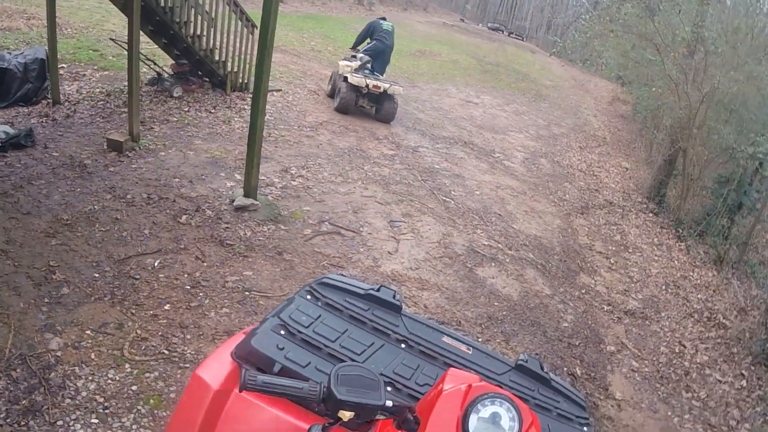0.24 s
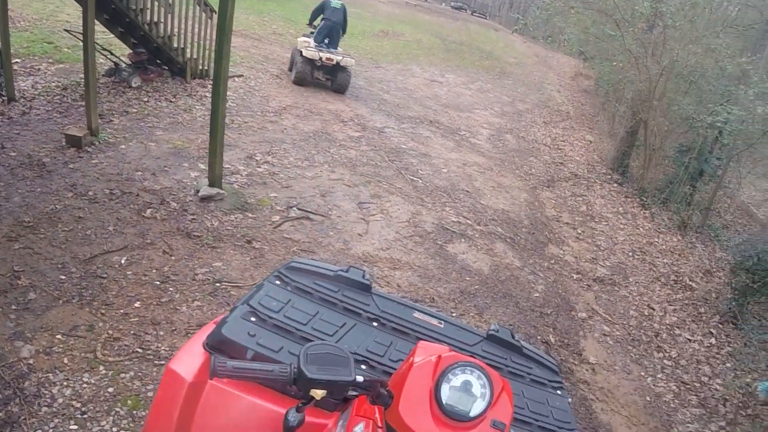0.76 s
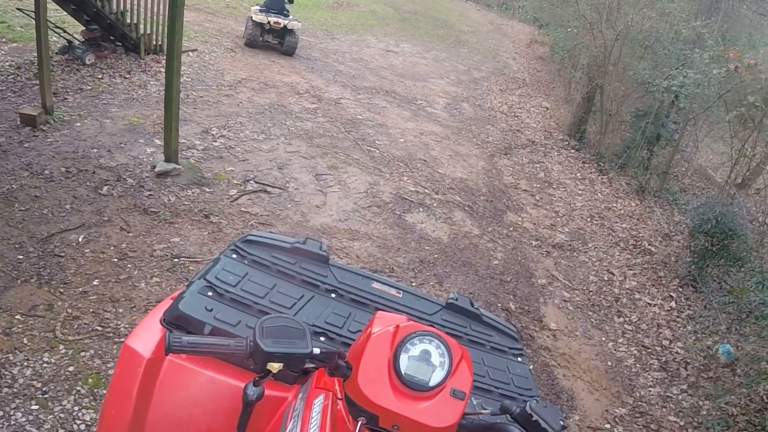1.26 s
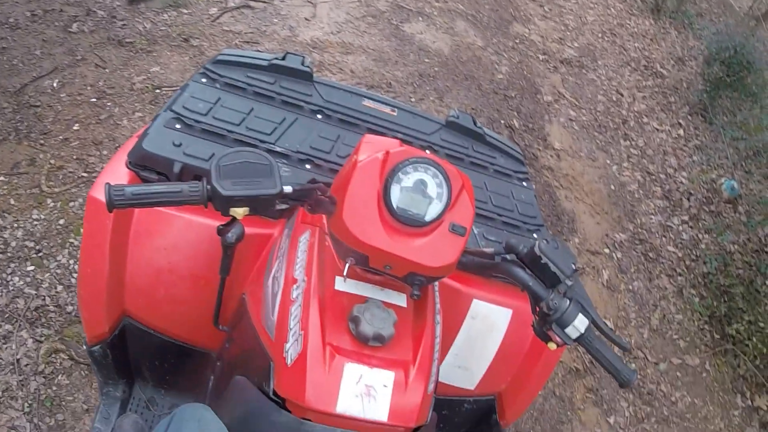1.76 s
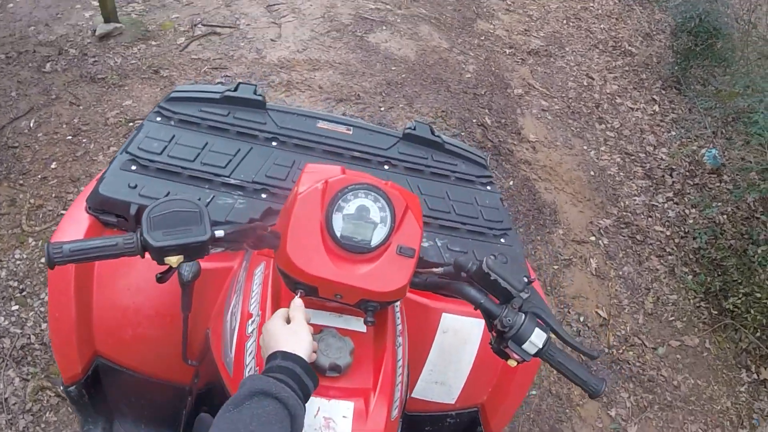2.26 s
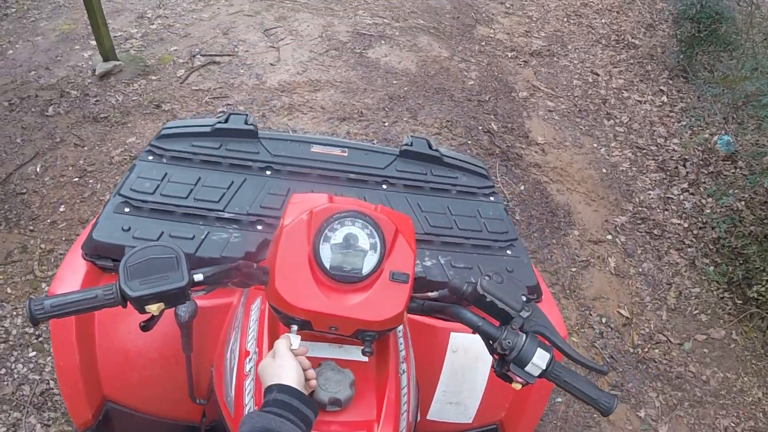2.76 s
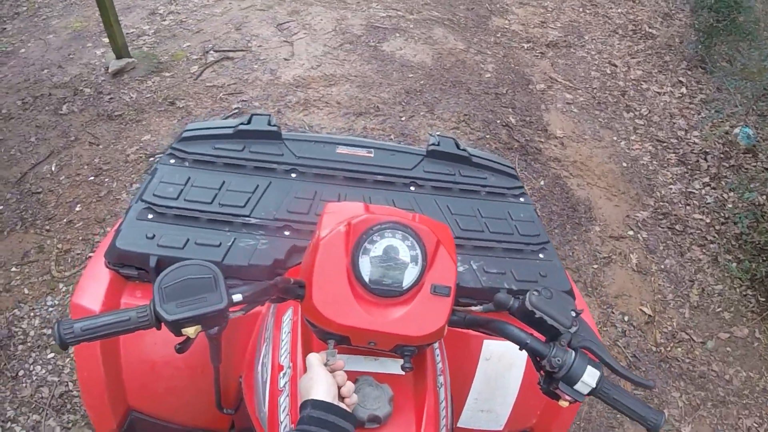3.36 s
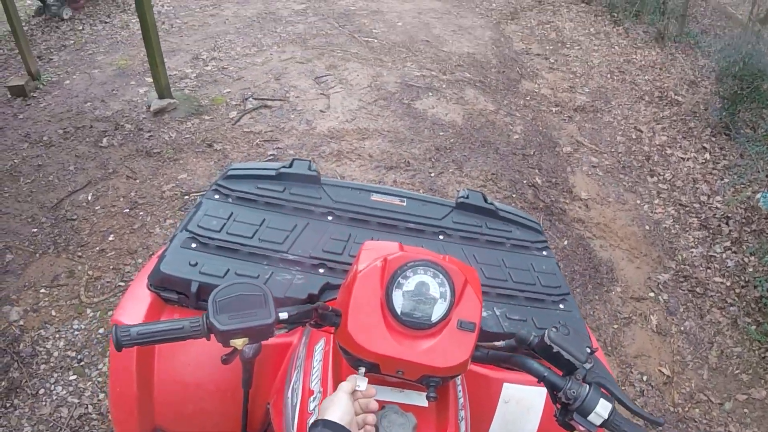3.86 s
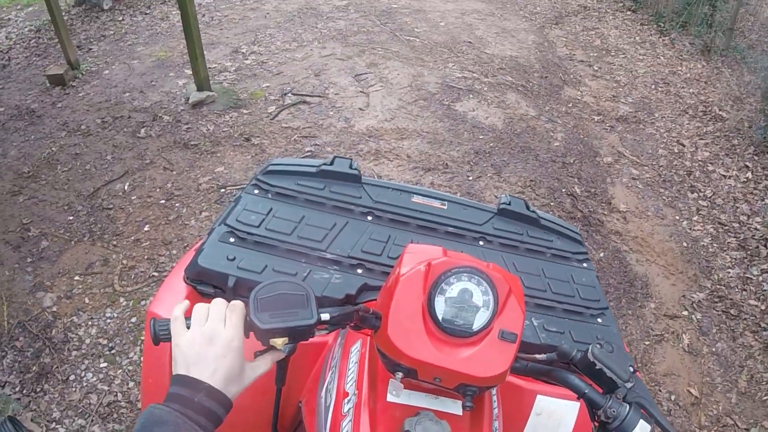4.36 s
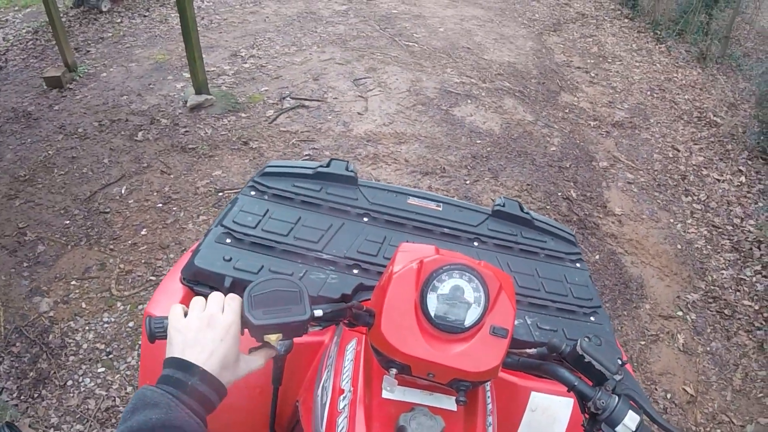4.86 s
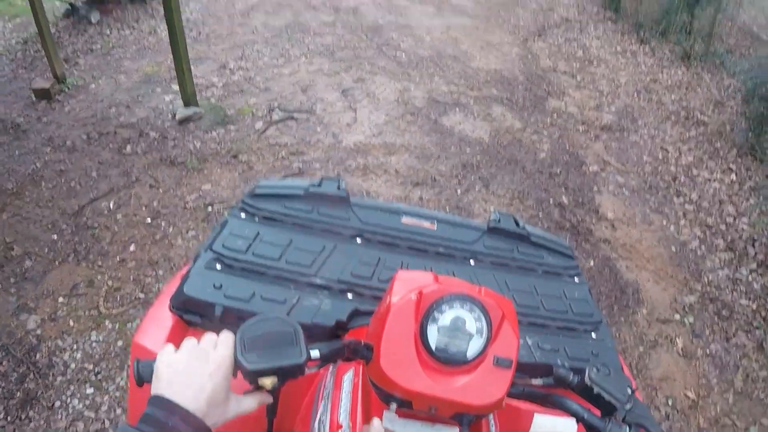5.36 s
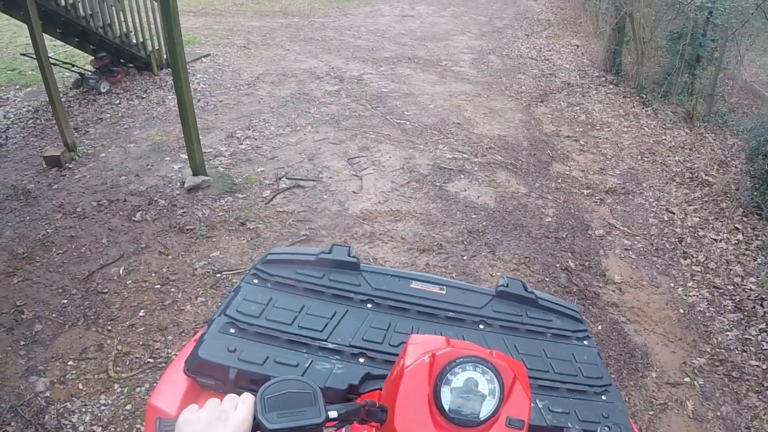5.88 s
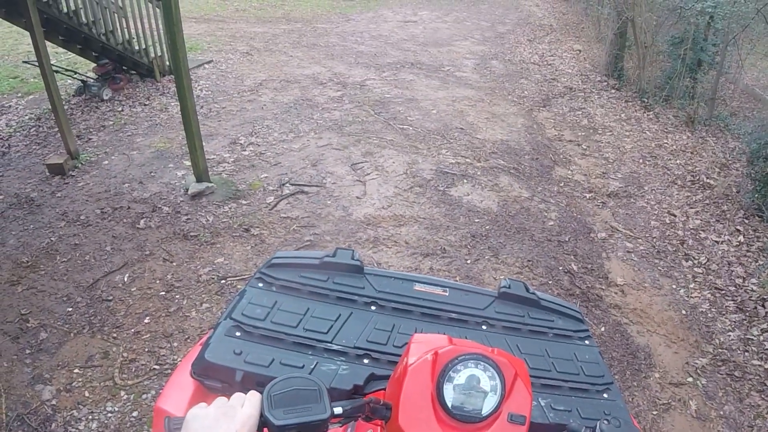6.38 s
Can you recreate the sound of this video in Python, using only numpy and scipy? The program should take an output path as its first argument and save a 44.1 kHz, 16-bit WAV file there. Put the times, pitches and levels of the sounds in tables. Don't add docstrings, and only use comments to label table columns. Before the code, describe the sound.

Low thudding idle of a small off-road engine with valve rattle, then a loud gear grind with thumping cranking, faster puttering, and a second short grind.

```python
import sys
import numpy as np
from scipy import signal
from scipy.fft import rfft, irfft, next_fast_len
from scipy.io import wavfile
from scipy.ndimage import uniform_filter1d

SR = 44100
rng = np.random.default_rng(int(sys.argv[2]) if len(sys.argv) > 2 else 0)


def master(y):
    cut = np.clip(np.atleast_2d(y).T, -1, 1)
    pcm = np.round(cut * 32767)
    wavfile.write(sys.argv[1], SR, pcm.astype(np.int16))


def boost(x):
    u = np.asarray(x, float) / 20
    return 10 ** u


N = 291942

# t/s, firing rate/Hz
FIRING_RATE = [(0, 22.06), (.9, 22.09), (1.05, 22.9), (1.8, 22.66), (2.4, 24.76), (3.45, 25.45),
               (3.6, 25.92), (4.5, 26.03), (4.95, 28.17), (5.55, 29.38), (6.3, 29.34), (6.62, 32.82)]
# t/s, boom through the frame/dB, pop at the pipe's mouth/dB
EXHAUST_LEVEL = [(0, -21, -32), (.4, -17.5, -40), (.9, -20, -38), (1.8, -21, -43), (2.1, -23.5, -38.5),
                 (2.5, -28, -39.5), (3, -26.5, -41), (3.6, -29.5, -37.5), (4.6, -30.5, -37.5),
                 (5, -29.5, -34), (5.6, -37.5, -37), (6, -55, -35), (6.3, -66, -37.5), (6.62, -62, -36)]
# f/Hz, width/Hz, level/dB
LONG_PIPE_MODES = [(187.8, 16.3, 1), (249, 51, -2), (298.1, 22, -4), (383, 15, -6.5)]
# f/Hz, width/Hz, level/dB
TAIL_PIPE_MODES = [(495, 45, 0), (580, 60, -4), (770, 50, -1), (880, 45, -3.5)]
# f/Hz, density/dB per Hz
PUFF_SPECTRUM = [(150, -18), (250, 9), (386, -9), (437, -28.5), (481, -10.5), (694, -8), (770, -1),
                 (1040, -99), (1300, -41), (1690, -58), (2860, -120)]
# t/s, clatter level/dB, head turned away/0-1, tick level/dB
VALVE_LEVEL = [(0, -39.5, 0.38, -47), (.7, -38.5, 0.39, -60), (1.15, -40.5, 0.24, -49),
               (1.45, -42.5, 0.4, -55), (1.7, -43, 0.52, -58.5), (2.3, -47.5, 0.51, -57.5),
               (2.87, -41, 0.84, -72), (5.0, -50, 1, -59.5), (5.3, -46, 0.86, -55), (5.7, -47, 0.79, -59.5),
               (6.2, -46.5, 0.68, -62), (6.62, -38.5, 0.7, -58)]
# f/Hz, density/dB per Hz
FACING_SPECTRUM = [(530, -68), (900, 4), (1100, -1), (1290, 10), (1410, -7.5), (1690, 13.5), (2270, -20.5),
                   (3570, -32), (4260, -27.5), (5410, 5.5), (5940, -9), (6940, -77.5), (9560, -20.5),
                   (12000, -18), (15400, -42)]
# f/Hz, density/dB per Hz
AWAY_SPECTRUM = [(530, 8.5), (900, 6), (944, -26), (1180, -36), (1790, 4), (1990, -0.5), (2500, -5),
                 (3440, -4), (4260, -16), (5540, -17.5), (6090, -8), (9790, -9.5), (11600, -41),
                 (14300, -38), (15400, -30)]
# head turned away/0-1, f/Hz
TICK_PITCH = [(.35, 5430), (.62, 7400), (.9, 6500)]
# t/s, f/Hz
SHINE_PITCH = [(0, 9700), (.8, 9400), (1.6, 7740), (2.6, 8000), (5.2, 9800)]
# t/s, grind level/dB, dullness/0-1
ENGAGEMENTS = [
    [(2.875, -41, 0), (3.06, -24.5, 0), (3.12, -32.5, 0), (3.24, -36.5, 0.35), (3.37, -34, 0.27),
     (4.34, -34, 0.15), (4.76, -41, 0.75), (5.06, -43, 1), (5.12, -53, .9)],
    [(6.158, -36.5, 0), (6.22, -26.5, 0.66), (6.342, -25.5, .2), (6.42, -39, 0), (6.63, -31.5, .15)],
]
# f/Hz, density/dB per Hz
SCRAPE_SPECTRUM = [(290, -17), (500, -13), (874, -17), (1330, -7), (1380, -20), (1570, -3), (1920, -8),
                   (2530, -2.5), (3770, -14), (5250, -4.5), (8540, -19.5), (10300, -21), (11900, -72),
                   (13700, -78), (15400, -103)]
# f/Hz, width/Hz, level/dB
GEAR_MODES = [(1425, 36, 14.5), (2033, 5.3, 4), (2622, 14, 6), (2765, 6.3, 7.5), (4180, 41, -6),
              (4640, 25, -43), (5360, 260, -39), (5950, 66, 4), (7400, 82, -6), (8800, 96, -10),
              (10100, 95, -36), (10600, 46, -7)]
# t/s, peak/dB, low ring/dB
MESH_CLANKS = [(2.874, -24, -31), (2.8905, -8.5, -31), (2.9, -20.5, 7.5), (2.936, -8.5, -27),
               (2.9634, -13, -16), (2.988, -11.5, -4), (3.034, -10, 4), (3.077, -9.5, -14),
               (3.1372, -8, -3), (3.1493, -15, 12.5), (3.288, -15, -27), (3.308, -7, -0.5),
               (3.387, -6.5, 9), (3.5516, -6.5, -5), (3.6066, -5.5, 1.5), (4.614, -21.5, -20),
               (4.694, -18.5, -10), (4.71, -45, 17), (6.1544, -23, -11), (6.1757, -10, 3.5),
               (6.234, -11.5, -33), (6.269, -15, 4), (6.296, -11, -21), (6.324, -10, -5), (6.4484, -8, 5),
               (6.515, -9.5, 5), (6.595, -5.5, 8)]
# t/s, peak/dB, low ring/dB
CRANKING_KNOCKS = [(3.715, -18.5, -27), (3.788, -13, -8), (3.885, -14.5, -22), (3.957, -14, -9),
                   (4.057, -16, -29.5), (4.122, -13.5, -23), (4.2, -29, -24), (4.244, -21, -20),
                   (4.305, -16.5, -13), (4.328, -25.5, 9), (4.41, -22, -15), (4.469, -16, 1.5),
                   (4.538, -20.5, 1)]
# f/Hz, level/dB
FIZZ_SPECTRUM = [(7500, -40), (9000, 2), (11000, 14), (12000, -41), (13500, 7), (15000, -24)]
# f/Hz, width/Hz, level/dB
FIZZ_MODES = [(9300, 300, 5), (9960, 280, -4), (10120, 140, 4), (13500, 850, -15)]
# t/s, length/s, start f/Hz, end f/Hz, peak/dB
PINION_WHINES = [
    (3.035, 0.079, 1365, 1280, -25),
    (6.294, 0.092, 1260, 985, -23.5),
]
# t/s, peak/dB, f/Hz
TOOTH_STRIKES = [(2.442, -45, 1900), (2.468, -39, 1100), (2.665, -33, 1650), (2.8955, -5, 6240),
                 (2.904, -10, 5370), (2.91, -15, 5360), (2.914, -22.5, 236), (2.941, -13, 4800),
                 (2.943, -18, 1080), (2.97, -15, 1170), (2.973, -14.5, 2300), (3.142, -20, 5270),
                 (3.316, -12, 5440), (3.401, -35, 4300), (3.428, -27, 230), (3.555, -12, 5700),
                 (3.62, -22, 1060), (4.123, -27, 2730), (4.701, -25.5, 3200), (4.704, -24, 1500),
                 (4.712, -26, 940), (4.716, -25.5, 520), (6.181, -6, 5430), (6.275, -14, 5660),
                 (6.519, -10, 5550)]
# t/s, peak/dB
TOOTH_SCRAPES = [
    (3.028, -16),
    (3.06, -17.5),
    (4.692, -17.5),
]
# t/s, peak/dB, f/Hz, cycles/1
JOLTS = [(0.352, -21, 83, 0.68), (1.658, -13.5, 92.5, 2.1), (1.715, -14, 101, 2.1),
         (2.919, -19, 60.7, 0.67), (3.166, -19.5, 59, 3), (3.443, -18.5, 64.5, 4.5),
         (4.697, -13.5, 102, 4.1), (4.721, -20, 43.8, 2.3), (4.787, -15, 60, 1.2)]
# t/s, peak/dB
COMPRESSION_STROKES = [(3.676, -11), (3.856, -11), (4.025, -10.5), (4.187, -13), (4.379, -9.5),
                       (4.53, -12.5)]
# f/Hz, density/dB per Hz
RUMBLE_SPECTRUM = [(11, -35), (20, -19), (35, -34), (70, -13), (110, 8.5), (185, -1.5), (380, -3.5),
                   (440, -15), (700, -14.5), (900, -27.5), (1100, -44), (1900, -50)]
# f/Hz, density/dB per Hz
AIR_SPECTRUM = [(530, -27), (900, 5), (1030, -2), (1450, -6.5), (1690, -8), (2560, -19), (3530, -9.5),
                (4310, -19), (5410, -4.5), (6310, -16), (9910, -25), (11600, -51), (14300, -24),
                (15400, -46)]


def firings(t):
    first_turn, uneven_db = .458 + .095, .9
    turns = np.floor(first_turn + np.cumsum(along(FIRING_RATE, t)[0]) / SR)
    at = np.flatnonzero(np.diff(turns))
    clicks = np.zeros(N)
    clicks[at] = boost(uneven_db * rng.standard_normal(len(at)))
    return clicks


def exhaust(clicks, t):
    boom_db, pop_db = along(EXHAUST_LEVEL, t)
    share = warmth(t)
    tail_db = between((-56, -41.5), share ** 2.25)
    puff_db = between((-44, -46.5), share ** 4)
    lag_ms = between((2.88, -1.1), share)
    facing = np.clip(2 - along(VALVE_LEVEL, t)[1] / 0.41, 0, 1)
    boom_hz = between((97.5, 103.9), share) + 2.8 * facing
    fall_db = boom_db + 17.5
    shake_db = -31 + 0.23 * fall_db
    long_db = -30 + 0.85 * np.maximum(fall_db, -14)

    boom = resonate(resonate(clicks, boom_hz, 20.2), boom_hz, 20.2)
    boom = np.interp(t - lag_ms / 1000, t, boom)
    loose = .018 * rng.standard_normal(N)
    shake = resonate(resonate(clicks + loose, 47, 34), 47, 34)

    ms = np.arange(1300) / SR * 1000
    falling = -np.sin(2 * np.pi * .48 * ms ** .58)
    shape = falling * ms / (ms + .7) * np.exp(-(ms / 8) ** 3)
    pop = np.roll(signal.oaconvolve(clicks, shape)[:N], -10)
    snap = signal.sosfilt(signal.butter(3, [350, 950], "band", fs=SR, output="sos"), clicks)
    warm = np.interp(t, [4.7, 6.4], [.96, 1.01])

    gate = signal.oaconvolve(clicks, ms * np.exp(-ms / 5.0))[:N]
    puff = colour((evened(gate) + .3) * rng.standard_normal(N), PUFF_SPECTRUM)

    out = boost(boom_db) * evened(boom) + boost(shake_db) * evened(shake)
    out += boost(pop_db) * evened(pop) + boost(puff_db) * puff
    out += boost(long_db) * modes(pop, LONG_PIPE_MODES)
    return out + boost(tail_db) * modes(snap, TAIL_PIPE_MODES, warm)


def valves(clicks, t):
    level_db, away, tick_db = along(VALVE_LEVEL, t)
    seated_s, seated_tick_hz = 5.05, 3250
    tick_hz = np.where(t < seated_s, along(TICK_PITCH, away)[0], seated_tick_hz)
    shine_hz = along(SHINE_PITCH, t)[0]
    away = np.clip(away, 0, 1)

    ms = np.arange(1800) / SR * 1000
    rise = 1 - np.exp(-ms / 1.1)
    burst = rise * np.exp(-ms / 8) + 0.26 * np.exp(-((ms - 21) / 3) ** 2)
    drive = (signal.oaconvolve(clicks ** 2.65, burst)[:N] + 0.15) * rng.standard_normal(N)
    draws = np.clip(rng.standard_normal((200, 4)), -2, 1.7)
    size, pitch, slap, high = draws[np.cumsum(clicks > 0)].T

    def knock(strength_db, decay_ms, hz, width):
        gate = signal.oaconvolve(clicks * boost(strength_db), rise * np.exp(-ms / decay_ms))[:N]
        return evened(resonate(resonate(gate * rng.standard_normal(N), hz, width), hz, width))

    cover = boost(-3) * knock(1.5 * slap, 6.5, 1700 * (1 + .03 * pitch), 300)
    cover = cover + boost(-17.5) * knock(2 * high, 8.9, 3600, 350)
    hiss = (1 - away) * (colour(drive, FACING_SPECTRUM) + cover) + away * colour(drive, AWAY_SPECTRUM)
    shaded = signal.oaconvolve(boost(level_db) * hiss, signal.firwin(127, 11300, fs=SR), "same")

    tick = knock(3 * size, 2.3, tick_hz * (1 + .04 * pitch), 700)
    shine = knock(3 * size + 2 * high, 2.5, shine_hz, 1600)
    ticks = boost(tick_db) * (tick + boost(-8) * shine)
    seated = boost(level_db - 9.5) * (t > seated_s) * knock(1.2 * slap, 3.2, 5620, 940)
    return shaded + ticks + seated


def starter(t):
    return grind(t) + clanks() + whines()


def grind(t):
    teeth = rng.standard_normal(N) * boost(2.7 * evened(uniform_filter1d(rng.standard_normal(N), 600)))
    scrape = colour(teeth, SCRAPE_SPECTRUM)
    muffled = evened(resonate(scrape, 1360, 1800)) + 0.42 * modes(teeth, GEAR_MODES[1:3])
    ring = modes(teeth, GEAR_MODES)
    out = np.zeros(N)
    for rows in ENGAGEMENTS:
        start_s, end_s = rows[0][0], rows[-1][0]
        grind_db, dull = along(rows, t)
        dull = np.clip(dull, 0, 1)
        ring_db = -2.5 * np.exp(-np.maximum(t - start_s, 0) / 0.33)
        engaged = uniform_filter1d(1. * (t > start_s) * (t < end_s), 60)
        bright = scrape + boost(ring_db) * ring
        out += engaged * boost(grind_db) * ((1 - dull) * bright + dull * muffled)
    return out


def clanks():
    blows, low, fizz = np.zeros((3, N))
    u = np.arange(4000) / SR
    for rows, length, fizz_db in [(MESH_CLANKS, 0.028, -43.5), (CRANKING_KNOCKS, 0.031, -31.5)]:
        shape = (1 - np.exp(-u / 0.0057)) * np.exp(-(u / length) ** 1.52)
        for s, db, low_db in rows:
            burst = boost(db - 10.0) * shape
            add(blows, s, burst)
            add(low, s, burst * boost(low_db))
            add(fizz, s, burst * boost(fizz_db - db))
    grain = boost(1.6 * evened(uniform_filter1d(rng.standard_normal(N), 50)))
    noise = evened(grain * rng.standard_normal(N))
    lowest = resonate(low * noise, 1420, 32)
    top = modes(colour(noise, FIZZ_SPECTRUM), FIZZ_MODES)
    return blows * colour(noise, SCRAPE_SPECTRUM) + 14 * lowest + fizz * top


def whines():
    out = np.zeros(N)
    for s, length, start_hz, end_hz, peak_db in PINION_WHINES:
        span = np.arange(s, s + length, 1 / SR)
        done = (span - s) / length
        hz = between((start_hz, end_hz), np.sin(np.pi / 2 * done) ** 2)
        db = peak_db - 22 * (2 * done - 1) ** 2
        noise = resonate(resonate(rng.standard_normal(len(span)), hz, 700), 1.3 * hz, 1500)
        tone = evened(resonate(noise, hz, 60))
        octave = evened(resonate(noise, 2 * hz, 120))
        add(out, span[0], boost(db) * (tone + .4 * octave))
    return out


def strikes():
    out, u = np.zeros(N), np.arange(2500) / SR
    rows = [(s, db, hz, 0.12 * (1000 / hz) ** 0.84) for s, db, hz in TOOTH_STRIKES]
    rows += [(s, db, 6050, 0.1) for s, db in TOOTH_SCRAPES]
    for s, db, hz, t60 in rows:
        burst = rng.standard_normal(len(u)) * boost(-60 * u / t60) * (1 - np.exp(-u / 0.00031))
        ring = resonate(resonate(resonate(burst, hz, 0.19 * hz), hz, .5 * hz), hz, hz)
        add(out, s, boost(db) * ring / abs(ring).max())
    return out


def thumps():
    out, u = np.zeros(N), np.arange(-1500, 3000) / SR
    strokes = [(s, db, 78.6, 3.3) for s, db in COMPRESSION_STROKES]
    for s, db, hz, cycles in [*JOLTS, *strokes]:
        width = np.where(u < 0, .27, .5) * cycles / hz
        wave = np.cos(2 * np.pi * hz * u - .5) + 0.19 * np.cos(2 * np.pi * 2.7 * hz * u)
        add(out, s + u[0], boost(db) * wave * np.exp(-(u / width) ** 2))
    return out


def rumble(t):
    lumps = boost(2.2 * evened(uniform_filter1d(rng.standard_normal(N), 5000)))
    level_db = between((-37, -43), warmth(t) ** 4)
    return boost(level_db) * colour(lumps * rng.standard_normal(N), RUMBLE_SPECTRUM)


def air():
    return boost(-51.5) * colour(rng.standard_normal(N), AIR_SPECTRUM)


def warmth(t):
    idle_hz, warm_hz = 22, 29.4
    return np.clip((along(FIRING_RATE, t)[0] - idle_hz) / (warm_hz - idle_hz), 0, 1)


def modes(x, table, stretch=1):
    return evened(sum(boost(db) * evened(resonate(x, hz * stretch, width)) for hz, width, db in table))


def resonate(x, hz, width):
    turn = np.exp(2j * np.pi * np.cumsum(hz * np.ones(len(x))) / SR)
    r = np.exp(-np.pi * width / SR)
    return 2 * (turn * signal.lfilter([1 - r], [1, -r], x / turn + 1e-18)).real


def colour(x, spectrum):
    f, db = np.transpose(spectrum)
    size = next_fast_len(len(x))
    hz = np.fft.rfftfreq(size, 1 / SR)
    gain = boost(np.interp(np.log(hz + 1), np.log(f + 1), db))
    return evened(irfft(rfft(x, size) * gain, size)[:len(x)])


def evened(x):
    return x / np.sqrt(np.mean(x ** 2) + 1e-20)


def along(rows, t):
    s, *columns = np.transpose(rows)
    return [np.interp(t, s, c) for c in columns]


def between(ends, share):
    return ends[0] + (ends[1] - ends[0]) * share


def add(mix, s, sound):
    part = mix[max(round(s * SR), 0):][:len(sound)]
    part += sound[:len(part)]


def scene():
    t = np.arange(N) / SR
    clicks = firings(t)
    engine = exhaust(clicks, t) + valves(clicks, t)
    cranking = starter(t) + strikes() + thumps()
    return (engine + cranking + rumble(t) + air())[None]


def low_pass(x):
    return signal.sosfilt(signal.butter(12, 15520, fs=SR, output="sos"), x)


def record(dry):
    limited = signal.oaconvolve(dry, signal.firwin(255, 14900, fs=SR)[None], "same")
    return low_pass(limited)


dry = scene()
out = record(dry)
master(out)
```